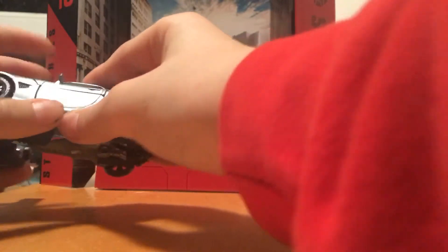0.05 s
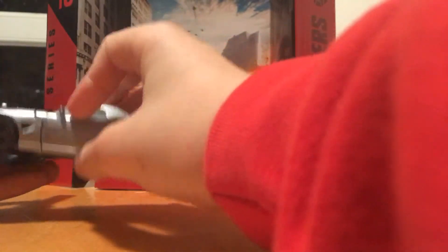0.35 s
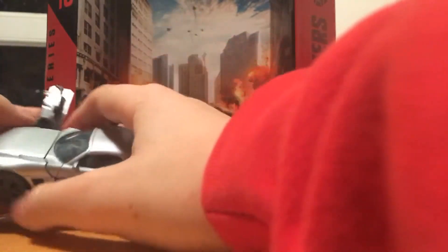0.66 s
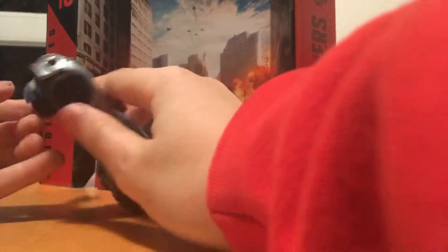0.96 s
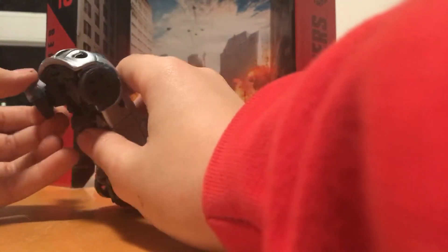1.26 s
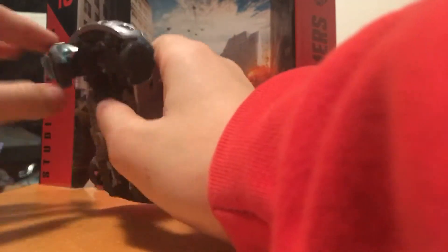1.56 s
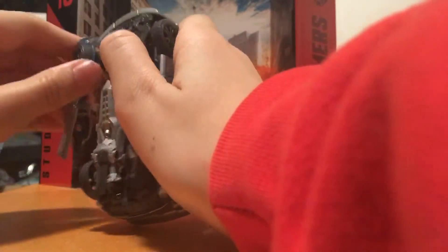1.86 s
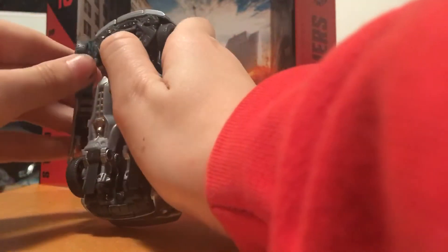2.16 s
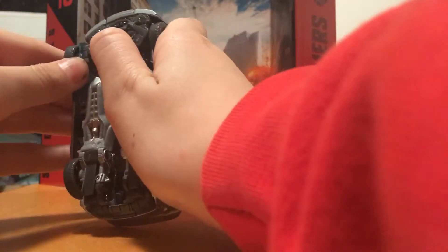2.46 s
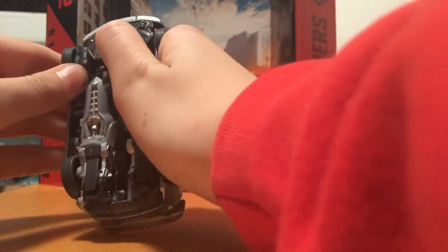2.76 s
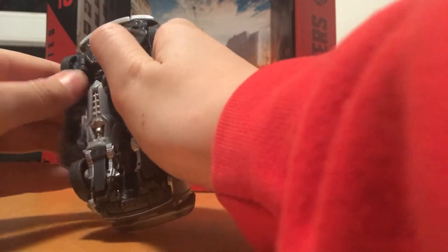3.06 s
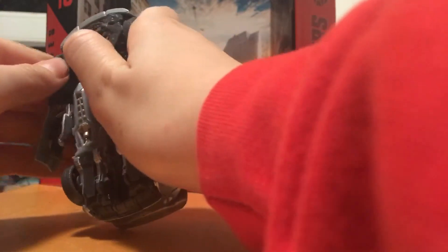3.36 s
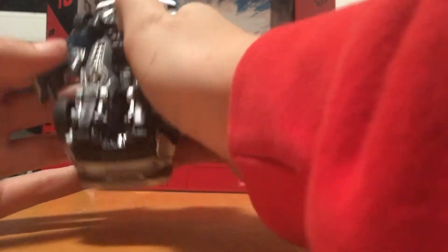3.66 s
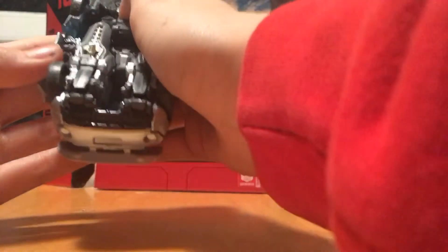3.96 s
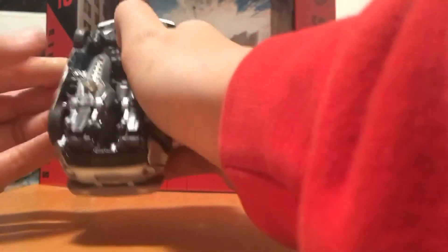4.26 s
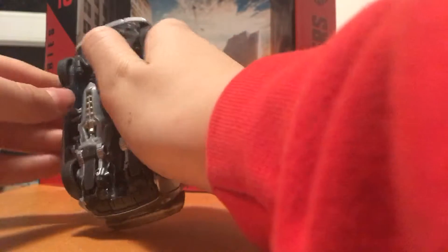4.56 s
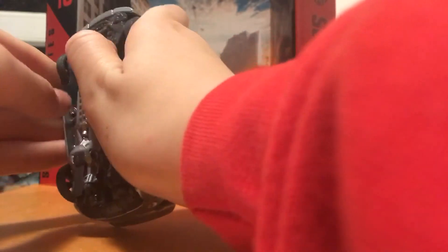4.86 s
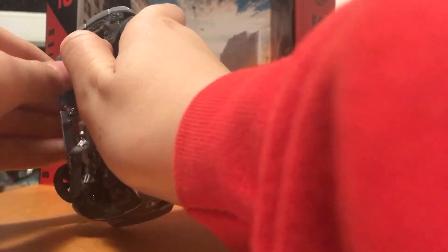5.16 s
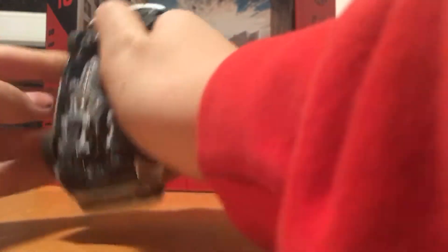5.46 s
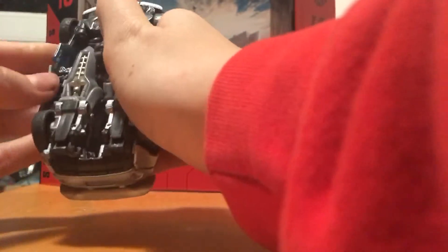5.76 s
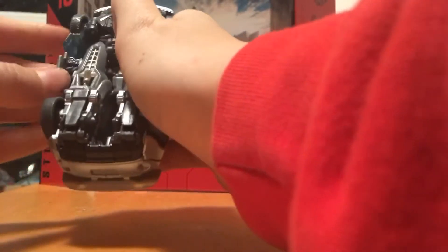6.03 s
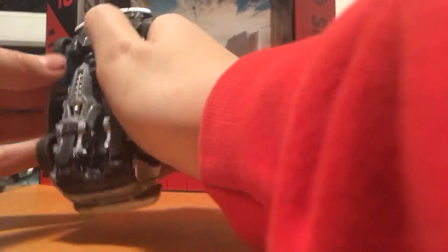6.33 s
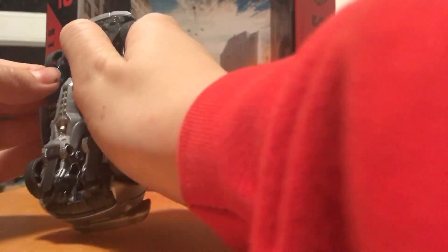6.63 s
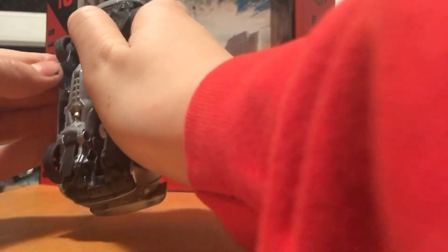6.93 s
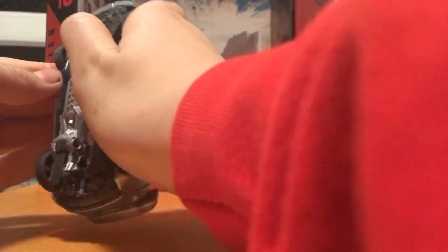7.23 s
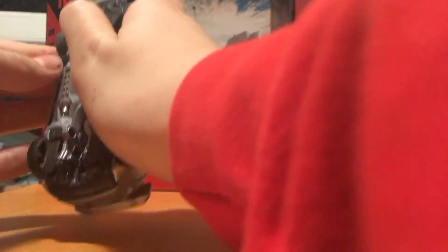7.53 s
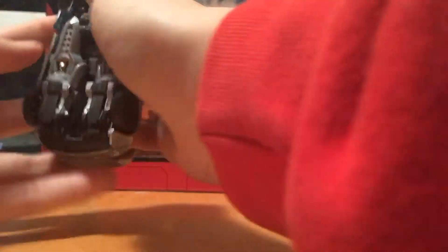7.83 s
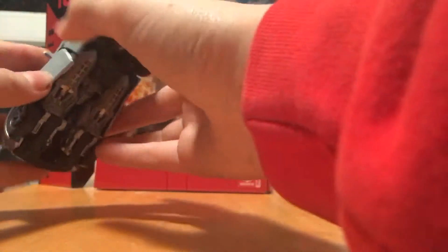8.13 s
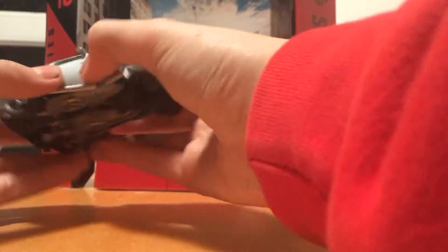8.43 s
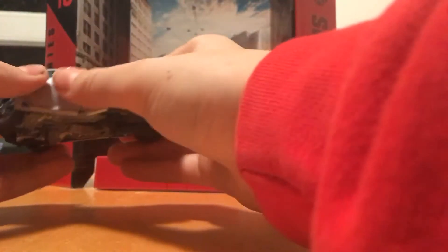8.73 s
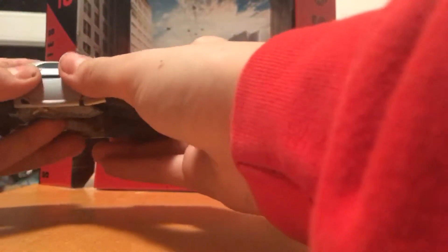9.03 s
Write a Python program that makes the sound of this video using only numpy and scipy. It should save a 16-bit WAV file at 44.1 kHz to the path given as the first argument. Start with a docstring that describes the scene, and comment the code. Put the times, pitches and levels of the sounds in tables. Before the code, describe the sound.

Small plastic joints click and snap as a toy car figure is folded by hand, with soft bumps on a wooden table.

```python
"""A plastic toy figure is folded by hand over a wooden table, close to a camera in a small room.
From the start, catches slip and snap home, ringing the hollow shell, and bumps set the table top booming.
Between the clicks, fingers slide over the shell, stiff joints tick and leaning hands rumble the table.
At 7.5 s the hardest snap shakes the whole shell; a long rub and lighter clicks follow until about 9 s."""
import sys
import numpy as np
from scipy import signal
from scipy.fft import rfft, irfft, next_fast_len
from scipy.io import wavfile
from scipy.ndimage import map_coordinates

SR = 44100
rng = np.random.default_rng(int(sys.argv[2]) if len(sys.argv) > 2 else 0)


def bounce(signal):
    """Save signal as a 16-bit WAV file at the path given by the first command-line argument."""
    frames = np.transpose(np.atleast_2d(signal))
    limited = np.clip(frames, -1, 1)
    pcm = np.round(limited * 32767).astype(np.int16)
    wavfile.write(sys.argv[1], SR, pcm)


N = 405279


def amp(db):
    """Decibels to gain."""
    return 10 ** (np.asarray(db) / 20)


def unit(x):
    """Scale to rms 1."""
    return x / np.sqrt(np.mean(x ** 2) + 1e-20)


def along(points, hz):
    """Interpolate (f/Hz, value) points on a log axis."""
    point_hz, values = np.transpose(points)
    return np.interp(np.log(hz + 1), np.log(point_hz + 1), values)


def filtered(x, response):
    """Apply a gain given as a function of frequency."""
    size = next_fast_len(len(x) + 4096)
    return irfft(rfft(x, size) * response(np.fft.rfftfreq(size, 1 / SR)), size)[:len(x)]


def coloured(x, spectrum):
    """Shape x by (f/Hz, level/dB) points, at rms 1."""
    return unit(filtered(x, lambda hz: amp(along(spectrum, hz))))


def minimum_phase(gain):
    """Promptest impulse response with this gain on the FFT grid."""
    cepstrum = irfft(np.log(gain + 1e-6))
    half = len(cepstrum) // 2
    cepstrum[1:half] *= 2
    cepstrum[half + 1:] = 0
    return irfft(np.exp(rfft(cepstrum)))


def wobble(rate_hz):
    """Smooth random curve."""
    knots = rng.standard_normal(int(N * rate_hz / SR) + 4)
    return map_coordinates(knots, [np.arange(N) * rate_hz / SR])


def add(track, at_s, sound):
    """Mix a sound into the track."""
    start = max(round(at_s * SR), 0)
    part = sound[:max(N - start, 0)]
    track[start:start + len(part)] += part


def ring(modes, t, scatter_db):
    """Decaying modes, each struck with a random strength."""
    return sum(amp(db + scatter_db * rng.standard_normal() - 60 * t / t60_s) * np.sin(2 * np.pi * hz * t)
               for hz, db, t60_s in modes)


def resonance(hz, centre_hz, width_hz):
    """Power gain of one mode."""
    return 1 / (1 + (2 * (hz - centre_hz) / width_hz) ** 2)


# noise floor: f/Hz, level/dB
AIR_SPECTRUM = [(15, -37.5), (25, 4), (90, -2), (163, -14), (278, -8), (462, -16.5), (952, -15),
                (1460, -23.5), (4380, -28), (4870, -33), (6540, -26), (9520, -29), (15000, -37.5)]


def air(level_db):
    """Quiet room and microphone hiss."""
    return amp(level_db) * coloured(rng.standard_normal(N), AIR_SPECTRUM)


# reflection colour: f/Hz, level/dB
ROOM_SPECTRUM = [(100, -12.5), (700, -7), (1900, -2), (3200, 7), (4800, 2.5), (7000, 0.5), (15000, 4)]
# reflection decay: f/Hz, t60/s
ROOM_DECAY = [(200, 0.37), (1000, 0.39), (3500, 0.17), (8000, 0.22), (15000, 0.1)]


def room(level_db, build_s):
    """Impulse response of nearby boxes and walls, new for every spot the hands move to."""
    hz, t, noise = signal.stft(rng.standard_normal(SR // 3), SR, nperseg=256)
    fade = amp(along(ROOM_SPECTRUM, hz)[:, None] - 60 * t / along(ROOM_DECAY, hz)[:, None])
    build = 1 - np.exp(-(t / build_s) ** 2)
    tail = signal.istft(noise * fade * build, SR, nperseg=256)[1]
    return amp(level_db) * tail / np.linalg.norm(tail)


# finger strokes: t/s, length/s, level/dB, scratchiness/dB
FINGER_STROKES = [(0.351, 0.058, -61, 2), (0.488, 0.16, -65, -2), (0.879, 0.15, -62, -3),
                  (1.45, 0.031, -66, 3), (1.613, 0.18, -67, -1.5), (1.87, 0.18, -63.5, 1),
                  (2.58, 0.058, -71, 2), (2.968, 0.24, -72.5, 5.5), (3.493, 0.11, -74.5, 4),
                  (4.743, 0.1, -66.5, 1), (5.447, 0.13, -67.5, 3), (5.942, 0.2, -75.5, 3),
                  (6.626, 0.24, -77, 0), (6.932, .035, -65, 2), (7.56, 0.383, -58, -10),
                  (8.018, 0.12, -63.5, -1.5), (8.304, 0.26, -80, 3.5), (8.907, 0.23, -80, -1)]


def strokes(attack_s, release_s, grip_db):
    """Rub and scratch envelopes: strokes set in, hold and let go; a resting grip still creeps."""
    t = np.arange(N) / SR
    rubbing = scratching = amp(grip_db)
    for at_s, length_s, db, scratch_db in FINGER_STROKES:
        corners_s = [at_s - attack_s, at_s, at_s + length_s, at_s + length_s + release_s]
        stroke = amp(db) * np.interp(t, corners_s, [0, 1, 1, 0])
        rubbing = rubbing + stroke
        scratching = scratching + amp(scratch_db) * stroke
    return rubbing, scratching


# hand pressure curve: t/s, level/dB
LEANING = [(0.0, -70.5), (0.87, -53), (1.71, -63), (2.17, -71), (2.35, -66.5), (3.33, -58), (3.68, -74),
           (4.17, -66.5), (4.43, -85), (4.84, -61), (5.14, -62.5), (5.58, -56.5), (6.4, -103), (6.73, -54),
           (7.24, -89), (7.55, -58.5), (8.68, -67), (9.19, -64.5)]
# table rumble: f/Hz, level/dB
RUMBLE_SPECTRUM = [(25, -24), (55, -13), (73, 0), (95, -8), (130, -12), (200, -18), (400, -22), (1000, -30),
                   (3000, -60)]


def table_rumble(scratching, press_db, drag_db, uneven_db):
    """Leaning, dragging hands rock the figure on the table, whose top rumbles."""
    leaning_db = np.interp(np.arange(N) / SR, *np.transpose(LEANING))
    pressure = amp(press_db + leaning_db) + amp(drag_db) * scratching
    rumble = coloured(rng.standard_normal(N), RUMBLE_SPECTRUM)
    return pressure * rumble * unit(amp(uneven_db * wobble(rate_hz=9)))


# friction on plastic: f/Hz, level/dB
FRICTION_SPECTRUM = [(300, -20.5), (1200, 2), (2200, -0.5), (3000, 0), (3700, 2.5), (4300, -5.5),
                     (7400, -5.5), (10000, -6), (15000, -14.5)]


def finger_rub(rubbing, gain_db, flicker_db):
    """Skin slides on the shell with a flickering hiss."""
    hiss = coloured(rng.standard_normal(N), FRICTION_SPECTRUM)
    return rubbing * amp(gain_db) * hiss * unit(amp(flicker_db * wobble(rate_hz=49)))


def joint_ticks(scratching, tick_db, rattle_db, rate_hz, spread_db):
    """Tight joints tick in tiny random slips, which rattle loose parts."""
    slips = (rng.random(N) < rate_hz / SR) * amp(spread_db * np.minimum(rng.exponential(size=N), 3))
    t = np.arange(SR // 100) / SR
    grit = signal.fftconvolve(slips, amp(-60 * t / 0.0157))[:N] * rng.standard_normal(N)
    reflections = signal.fftconvolve(grit, room(level_db=-5, build_s=0.0018))[:N]
    ticks = coloured(grit + reflections, FRICTION_SPECTRUM)
    rattle = unit(filtered(grit, lambda hz: 1 / (1 + 2j * (hz - 3750) / 160)))
    return scratching * (amp(tick_db) * ticks + amp(rattle_db) * rattle)


# slow bending of the top: f/Hz, level/dB, t60/s
BOOM_MODES = [(75.6, 5.5, 0.26), (82, -17.5, 0.077)]
# wood modes that only a knock excites: f/Hz, level/dB, t60/s
KNOCK_MODES = [(107.3, 2, 0.32), (124, 9.5, 0.15), (152, -2.5, 0.098), (202, 1, 0.18), (238.2, -4, 0.29),
               (292, -12.5, 0.28), (337, 6, 0.074), (363.7, -2.5, 0.14), (430, -12.5, 0.033),
               (548, -6, 0.18), (621, 1.5, 0.083), (644, -4, 0.17), (729, -2.5, 0.18), (843, -7, 0.077),
               (1066, -11, 0.048), (1540, 5.5, .05)]
# impact noise: f/Hz, level/dB
THWACK_SPECTRUM = [(100, 0), (250, 1.5), (400, -3.5), (900, -9.5), (1700, -12), (2300, -28), (6000, -38)]
# figure and hands hitting the table: t/s, boom level/dB, knock level/dB, hardness/dB
TABLE_BUMPS = [(0.374, -46, -56.5, -27), (0.568, -38.5, -44.5, -9.5), (0.689, -37, -38, -15),
               (0.902, -60, -54.5, -19), (0.951, -41, -57, -28), (0.997, -30.5, -36.5, -11),
               (1.204, -55, -55, -15.5), (1.259, -44.5, -59.5, -16), (1.302, -47, -47.5, -16),
               (1.5, -74, -60, -13), (1.898, -36, -40.5, -25), (2.148, -42, -53.5, -22),
               (2.198, -57, -53.5, -37), (2.285, -49.5, -83, -26), (2.339, -65, -53, -17),
               (2.743, -48, -72, -18), (2.913, -37, -44, -20), (3.158, -54, -56.5, -14),
               (3.268, -47, -74, -10), (3.396, -39, -49.5, -22.5), (3.868, -44.5, -66, -12),
               (3.911, -42, -55.5, -50), (4.234, -42, -57.5, -21), (4.557, -39.5, -40.5, -22),
               (4.857, -44.5, -53.5, -37), (5.204, -50.5, -68.5, 1), (6.008, -51.5, -73, -33),
               (6.689, -40.5, -54, -25), (6.723, -40.5, -50, -32), (7.385, -35.5, -45.5, -26),
               (7.539, -34, -57, -13.5), (8.085, -58, -60.5, -9), (9.059, -47.5, -65, -6),
               (9.149, -60, -63, -29)]


def table_bumps(boom_gain_db, knock_gain_db, thwack_db, thwack_t60_s, swell_s):
    """A bump knocks the wood at once; the heavy top takes a cycle to swing up."""
    out, t = np.zeros(N), np.arange(SR // 2) / SR
    hz = np.fft.rfftfreq(1024, 1 / SR)
    boom = ring(BOOM_MODES, t, scatter_db=0) * (1 - np.exp(-t / swell_s))
    for at_s, boom_db, knock_db, hard_db in TABLE_BUMPS:
        add(out, at_s, amp(boom_db + boom_gain_db) * boom / np.abs(boom).max())
        thwack = coloured(rng.standard_normal(len(t)), THWACK_SPECTRUM) * amp(-60 * t / thwack_t60_s)
        wood = unit(ring(KNOCK_MODES, t, scatter_db=1.5)) + amp(thwack_db) * unit(thwack)
        # soft contact leaves the upper modes still
        contact = [(350, 0), (1100, hard_db + 15.5), (2000, hard_db + 3.5), (5000, hard_db + 18)]
        knock = signal.fftconvolve(wood, minimum_phase(amp(along(contact, hz))))
        add(out, at_s, amp(knock_db + knock_gain_db) * unit(knock))
    return out


# stiff joints turning: t/s, notch gap/s, level/dB, ring f/Hz
JOINT_TURNS = [(0.325, 0.035, -64, 3900), (1.663, 0.035, -55.5, 3500), (3.511, 0.037, -62.5, 3720),
               (4.769, 0.025, -57.5, 2770), (6.467, 0.031, -57, 3200), (7.206, 0.023, -56, 1680),
               (8.028, .014, -46, 2810), (8.295, 0.11, -61.5, 2500), (8.889, 0.04, -52, 3000)]


def notches(count, jitter, scatter_db, detune, hollow_db, body_db):
    """A stiff joint clicks at each notch, a little unevenly; returns rows for snaps()."""
    rows = []
    for start_s, gap_s, db, ring_hz in JOINT_TURNS:
        for k, (late, force, pitch) in enumerate(rng.standard_normal((count, 3))):
            at_s = start_s + gap_s * k * (1 + jitter * late)
            notch_hz = ring_hz * np.exp(detune * pitch)
            rows.append((at_s, db + scatter_db * force, notch_hz, hollow_db, body_db))
    return rows


# hollow plastic shell: f/Hz, width/Hz, level/dB
SHELL_MODES = [(721, 190, -6.5), (1520, 120, 0.5), (2400, 150, -3.5), (3066, 190, -8), (3655, 300, -1),
               (5564, 220, -8), (6430, 1100, -2), (7400, 330, -11), (8100, 320, -13.5), (9490, 480, 0.5),
               (10600, 270, -3), (12100, 560, -1.5), (13340, 400, -13.5), (13800, 470, -9)]


def panel(ring_hz, colour, ring_db, crack_db, scatter_db, detune):
    """Impulse response of one part: its own ring on the shell's modes, which shift with the grip."""
    hz = np.fft.rfftfreq(1024, 1 / SR)
    grip = rng.standard_normal((len(SHELL_MODES), 2))
    shell = sum(amp(db + scatter_db * force) ** 2 * resonance(hz, mode_hz * np.exp(detune * pitch), width_hz)
                for (mode_hz, width_hz, db), (force, pitch) in zip(SHELL_MODES, grip))
    own_ring = 1 + amp(ring_db) ** 2 * resonance(hz, ring_hz, width_hz=450)
    power = (amp(crack_db) ** 2 + shell) * own_ring
    response = minimum_phase(np.sqrt(power) * amp(along(colour, hz)))
    return response / np.linalg.norm(response)


def part_colour(hollow_db, body_db, force_db):
    """Large panels are hollow and dull, small pegs and hard snaps bright: f/Hz, level/dB."""
    treble_db = -2 - 0.2 * body_db + 0.061 * force_db
    return [(100, hollow_db - 20), (500, hollow_db), (1500, hollow_db), (2300, body_db), (3800, body_db),
            (5500, 0), (8000, 0), (10000, treble_db), (15000, treble_db - 2.5), (18000, treble_db - 26)]


def catch_slip(t, rise_t60_s, fall_t60_s, blow):
    """A catch rides over its ridge in a burst of tiny impacts and seats with one blow at t = 0."""
    burst = rng.standard_normal(len(t)) * amp(-60 * np.maximum(-t / rise_t60_s, t / fall_t60_s))
    return burst / np.linalg.norm(burst) + blow * (t == 0)


# loose parts ringing on: f/Hz, level/dB, t60/s
LOOSE_MODES = [(3070, -0.5, 0.071), (3626, -4, .05), (3700, -3.5, 0.076)]
# joints and panels seating: t/s, level/dB, ring f/Hz, hollowness at 1 kHz/dB, body at 3 kHz/dB
SNAPS = [(0.3784, -40.5, 6760, -19, -1), (0.51, -50, 3230, -3, 5), (0.5705, -34, 3960, 3.5, 6),
         (0.6885, -30.5, 4300, -10, 4), (0.9, -55, 3920, 8, 22), (0.918, -50.5, 3930, 24, 17),
         (0.9712, -52.5, 3850, -5, 1), (0.9967, -37, 1490, 12, 8.5), (1.3065, -49.5, 1540, 20, 14.5),
         (1.8333, -42, 5170, 2.5, 5), (1.8571, -41.5, 6400, 5.5, 6.5), (1.8964, -46, 4070, 9, 6),
         (2.1488, -40.5, 4360, 5.5, 8), (2.1977, -42, 3400, 0, 6.5), (2.324, -55, 3470, 17, 8),
         (2.338, -42, 3550, 11, 14.5), (2.3501, -49, 4170, 13, 9), (2.6367, -46.5, 3380, 7, 2.5),
         (2.9016, -44.5, 7040, -8, 4), (2.914, -29, 2170, -1.5, 0), (3.1569, -49.5, 1430, 3, 4),
         (3.2677, -49, 3160, 8.5, 6), (3.4003, -38.5, 3660, 7, 5), (3.8455, -45, 3230, -1, 0.5),
         (3.8927, -41, 2420, -4.5, 0), (3.923, -46.5, 3430, -9, 10), (3.94, -31.5, 2390, -5, 6),
         (3.9569, -43, 3400, -3, 24), (4.1564, -49, 12700, -14, 1), (4.2076, -35, 2400, 2, 3),
         (4.2085, -43, 1190, 14, 4), (4.5611, -44.5, 3830, -3, 3.5), (4.7402, -52, 5900, -1, 0),
         (4.8609, -48.5, 6200, -2, 5.5), (5.1481, -47, 6230, 2, 1), (5.7231, -49, 3400, -3, -2),
         (5.8143, -52.5, 3360, 4.5, 3), (5.9364, -44, 3480, 0, 3.5), (5.9702, -53, 3350, 17, 14),
         (6.028, -41.5, 2380, 5.5, 4.5), (6.323, -40, 11700, -5, -5), (6.595, -56.5, 3340, 3, 5.5),
         (6.6885, -30, 5660, -3.5, 1), (6.8424, -55, 2260, 11, 7), (6.8927, -50.5, 3680, 5, -1),
         (6.922, -43.5, 11200, -2, 2.5), (6.9336, -48, 3700, 4.5, 2), (6.9874, -54.5, 1625, 7, 12),
         (7.526, -40.5, 5000, -3, 3), (7.536, -13, 3707, -0.5, -3), (8.0367, -39, 9190, 3, 0.5),
         (8.083, -45.5, 4350, 6, 1), (9.0288, -45.5, 3420, 9, 5), (9.051, -44, 3380, -12, -3),
         (9.0727, -35.5, 7560, 3, 0.5), (9.1448, -52.5, 3420, 13.5, 5)]


def snaps(notch_rows, gain_db, room_db, loose_db, firm_db, hard_db, rebound_s, rebound_db):
    """A catch snaps home, rings its part and chatters once; a hard snap shakes the whole shell."""
    out, t = np.zeros(N), np.arange(-256, 512) / SR
    for at_s, db, ring_hz, hollow_db, body_db in SNAPS + notch_rows:
        level = amp(db + gain_db)
        firm = np.clip((db - firm_db) / 11.5, 0, 1)
        hard = np.clip((db - hard_db) / 10, 0, 1)
        colour = part_colour(hollow_db, body_db, force_db=db - hard_db)
        # larger, lower panels ring more when snapped firmly
        ring_db = 8.5 + 6 * firm * max(np.log2(3770 / ring_hz), 0) - 4.5 * hard
        part = panel(ring_hz, colour, ring_db, crack_db=-8.5 - 13 * hard,
                     scatter_db=2.8 * (1 - hard), detune=0.062 * (1 - hard))
        slip = catch_slip(t, rise_t60_s=0.005, fall_t60_s=0.014, blow=0.6 * firm)
        snap = signal.fftconvolve(slip, part)
        snap *= level / np.linalg.norm(snap)
        add(out, at_s + t[0] + 0.0006, snap)
        delay_s = rebound_s * (0.5 + rng.random())
        add(out, at_s + t[0] + delay_s, (1 - hard) * amp(rebound_db) * snap)
        # the room hears the part from all sides
        tail = room(room_db, build_s=0.0073)
        loose = amp(loose_db) * ring(LOOSE_MODES, np.arange(len(tail)) / SR, scatter_db=2)
        all_sides = panel(ring_hz, colour, ring_db=3, crack_db=-5 - 10 * hard,
                          scatter_db=2 * (3 - hard), detune=0.079 * (1 - hard))
        add(out, at_s, level * signal.fftconvolve(tail + loose, all_sides))
    return out


def scene():
    """Table, hands, figure and room at one microphone."""
    bumps = table_bumps(boom_gain_db=4, knock_gain_db=-6, thwack_db=-5.5, thwack_t60_s=0.13,
                        swell_s=0.005)
    rubbing, scratching = strokes(attack_s=0.022, release_s=0.049, grip_db=-75.5)
    rumble = table_rumble(scratching, press_db=0.5, drag_db=1, uneven_db=2.5)
    rub = finger_rub(rubbing, gain_db=-4.5, flicker_db=2.5)
    ticks = joint_ticks(scratching, tick_db=-4, rattle_db=-14.5, rate_hz=45, spread_db=7)
    notch_rows = notches(count=3, jitter=0.037, scatter_db=0.82, detune=0.12, hollow_db=6, body_db=2)
    clicks = snaps(notch_rows, gain_db=24, room_db=-10.5, loose_db=-57, firm_db=-45, hard_db=-22.5,
                   rebound_s=0.005, rebound_db=-11.5)
    return (air(level_db=-66) + rumble + rub + ticks + bumps + clicks)[None]


# microphone response: f/Hz, level/dB
MIC_RESPONSE = [(4200, -1.5), (4900, 0), (5700, -2), (9900, -2), (10400, -6), (11000, -1.5)]


def record(dry):
    """The camera's microphone thins deep bass, rounds peaks, notches the treble and limits the band."""
    low_hz, top_hz, ceiling = 52, 15900, 0.8
    thinned = signal.sosfilt(signal.butter(4, low_hz, "highpass", fs=SR, output="sos"), dry)
    rounded = thinned / (1 + np.abs(thinned / ceiling) ** 6) ** (1 / 6)
    response = lambda hz: amp(along(MIC_RESPONSE, hz)) / np.sqrt(1 + (hz / top_hz) ** 160)
    return np.array([filtered(channel, response) for channel in rounded])


dry = scene()
out = record(dry)
bounce(out)
```